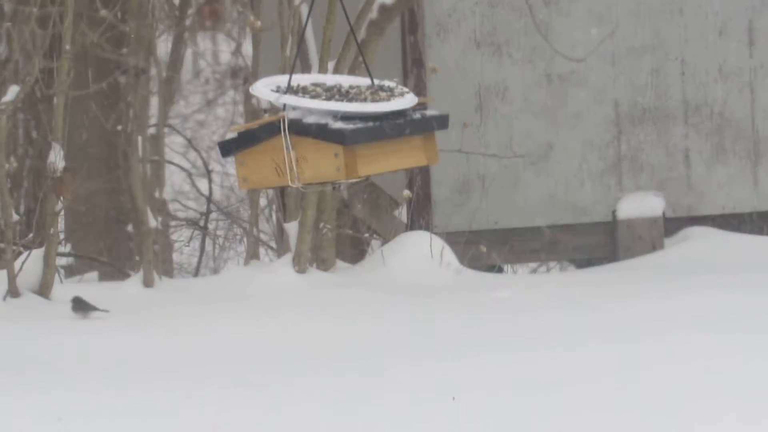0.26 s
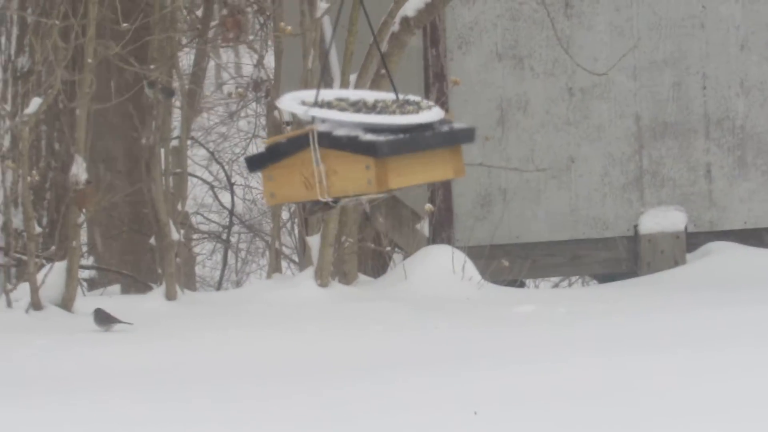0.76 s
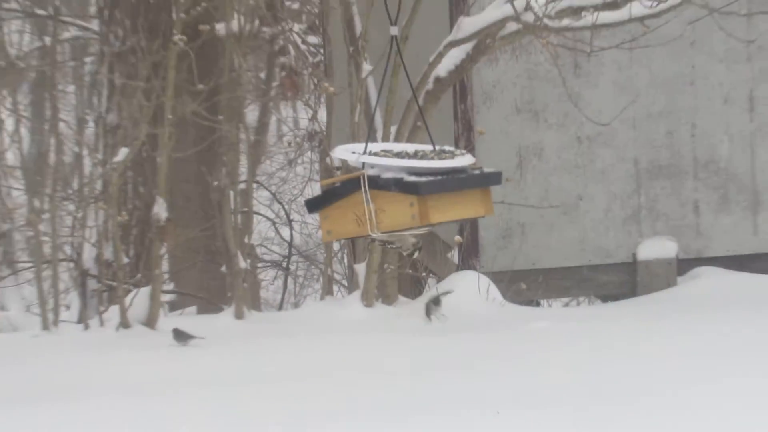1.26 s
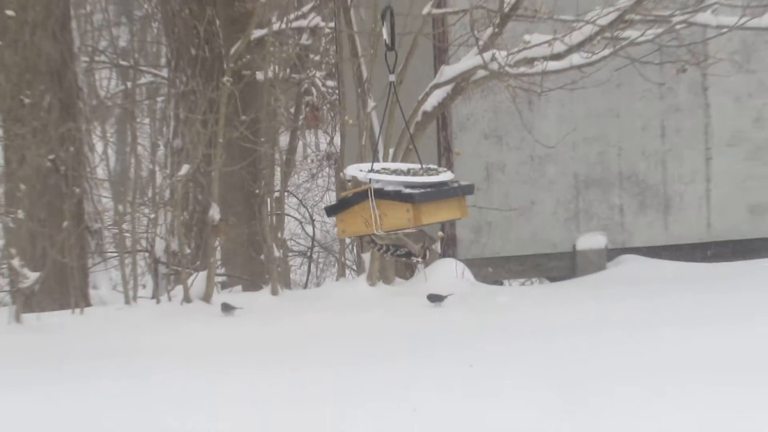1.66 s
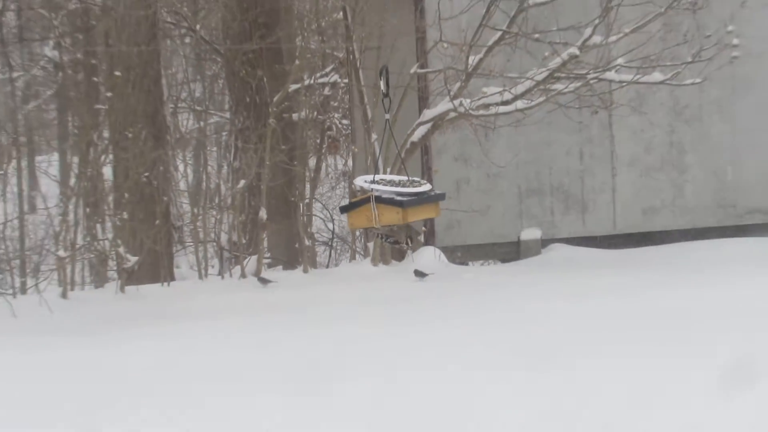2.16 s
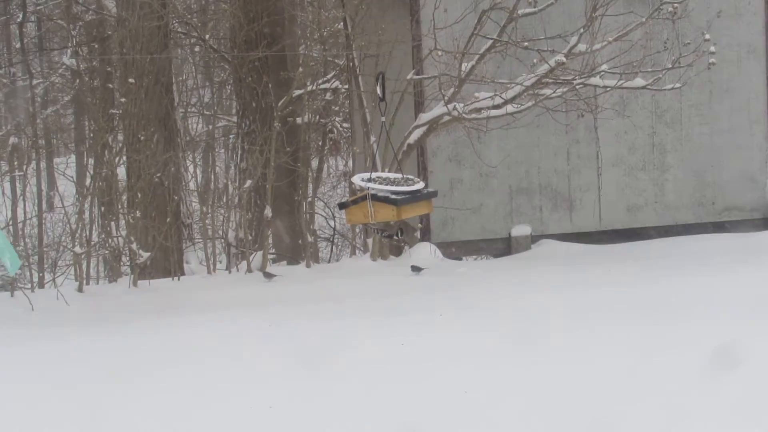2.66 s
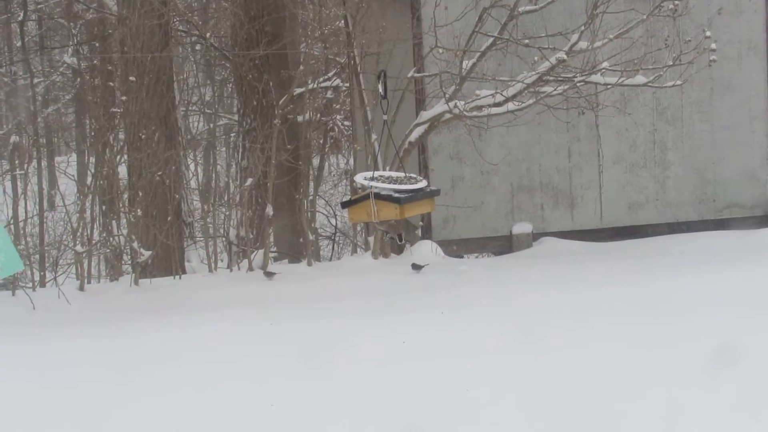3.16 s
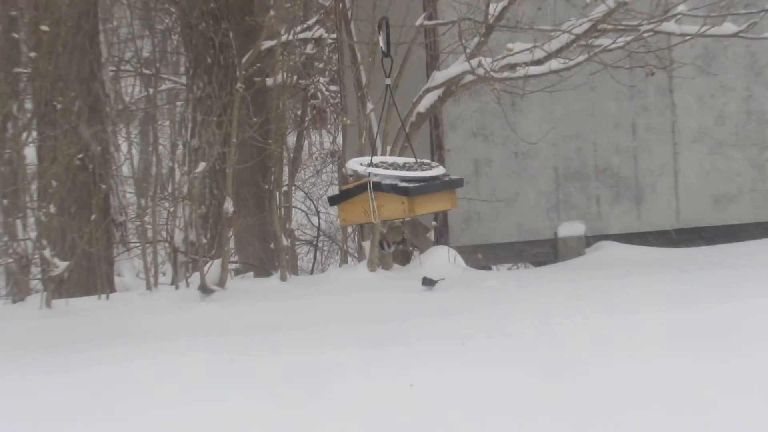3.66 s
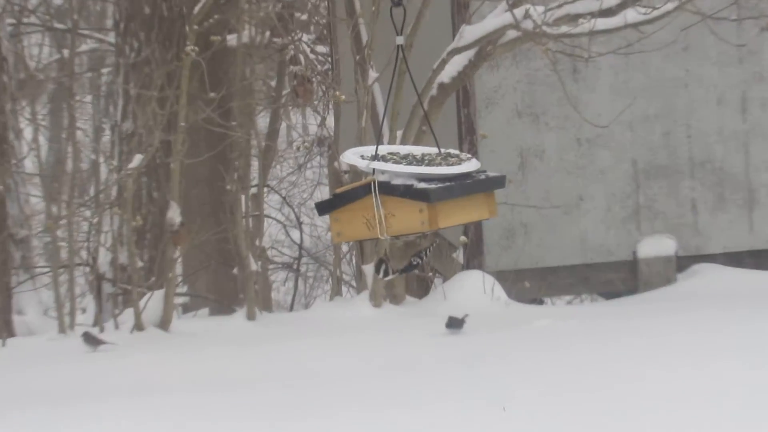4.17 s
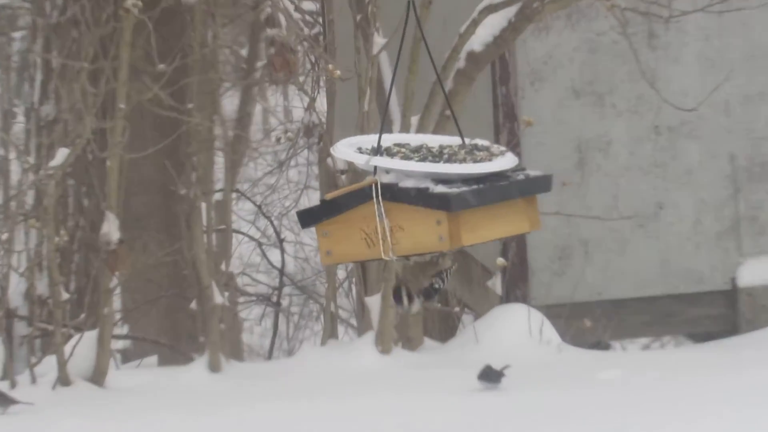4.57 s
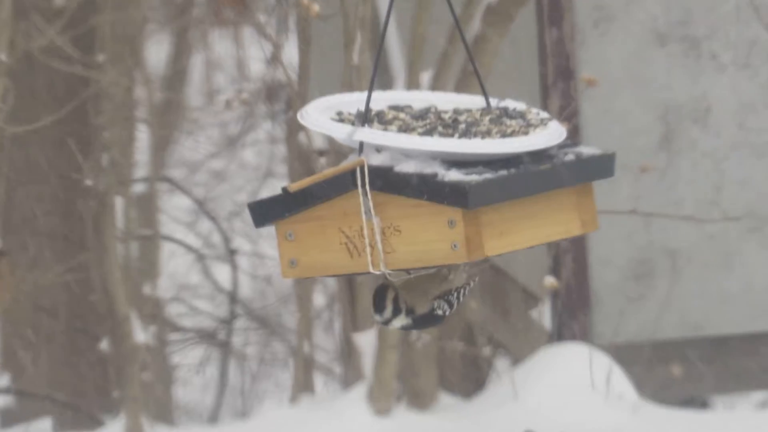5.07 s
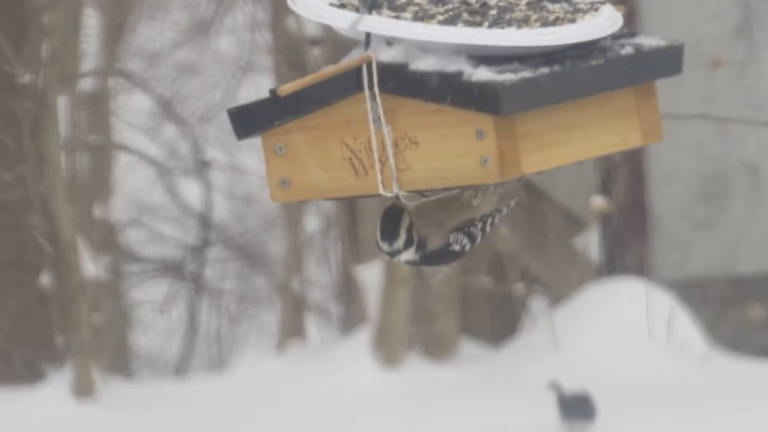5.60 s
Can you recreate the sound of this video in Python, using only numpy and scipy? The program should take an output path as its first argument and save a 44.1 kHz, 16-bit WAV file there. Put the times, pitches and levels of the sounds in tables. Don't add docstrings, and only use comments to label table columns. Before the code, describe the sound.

Close-up camera handling noise: loud snaps, creaks, a buzzing zoom motor, a quiet gap with clicks, a second buzz, and closing clicks.

```python
import sys
import numpy as np
from scipy import signal
from scipy.fft import rfft, irfft, next_fast_len
from scipy.io import wavfile
from scipy.ndimage import uniform_filter1d

SR = 44100
rng = np.random.default_rng(int(sys.argv[2]) if len(sys.argv) > 2 else 0)


def waveform_to_disk(signal):
    frames = np.transpose(np.atleast_2d(signal))
    scaled = np.clip(frames, -1, 1) * 32767
    samples = np.round(scaled).astype(np.int16)
    wavfile.write(sys.argv[1], SR, samples)


def makeup_ratio(level_db):
    decades = np.asarray(level_db, float) / 20
    return 10 ** decades


N = 257367

# time_s, level_db
GAIN = [(0.0, -54.5), (0.16, -65), (0.5, -63), (0.8, -59), (0.99, -61.5), (1.02, -80.5), (1.27, -67.5),
        (1.62, -62.5), (2.16, -59.5), (2.45, -64), (3.1, -58), (3.3, -69.5), (3.41, -60.5), (3.93, -57.5),
        (4.2, -55.5), (5.32, -55.5), (5.5, -58.5), (5.84, -61)]
# pitch_hz, level_db, t60_s (time to fade by 60 dB)
SHELL = [(2060, -8, 0.03), (2330, -1, 0.02), (2560, 9, 0.016), (2920, 0, 0.031), (3166, 17, 0.0087),
         (3440, 2, 0.021), (3660, 7, 0.022), (4520, -14, .01)]
# pitch_hz, level_db, t60_s
KNOCK = [(930, 12.6, 0.037), (1013, 5.4, 0.07), (1250, 14.4, 0.018), (1528, 10, 0.034)]


def rms_one(x):
    return x / np.sqrt(np.mean(x ** 2) + 1e-20)


def smooth(curves):
    return uniform_filter1d(curves, size=300, mode="nearest")


def in_time(spans):
    t = np.arange(N) / SR
    out = -130
    for rows in spans:
        time_s, *columns = np.transpose(rows)
        curves = [np.interp(t, time_s, c, left=-130, right=-130) for c in columns]
        out = np.maximum(out, curves)
    return smooth(out)


def coloured(x, spectrum):
    size = next_fast_len(N)
    hz, level_db = np.transpose(spectrum)
    f = np.arange(size // 2 + 1) * SR / size
    gain = makeup_ratio(np.interp(np.log(f + 1), np.log(hz), level_db, left=-90, right=-90))
    return rms_one(irfft(rfft(x, size) * gain, size)[..., :N])


def drift(rate_hz):
    r = np.exp(-2 * np.pi * rate_hz / SR)
    wander = signal.lfilter([1], [1, -2 * r, r * r], rng.standard_normal(N + SR))
    return rms_one(wander[SR:])


def resonance(x, hz, width_hz):
    r = np.exp(-np.pi * width_hz / SR)
    poles = [1, -2 * r * np.cos(2 * np.pi * hz / SR), r * r]
    return signal.lfilter([(1 - r * r) / 2, 0, (r * r - 1) / 2], poles, x)


def low_pass(x, hz):
    return signal.sosfilt(signal.butter(6, hz, fs=SR, output="sos"), x)


def strike(times, peaks_db, modes, contact_s, centres_hz=None, spread=.3):
    overtone, overtone_share = 1.45, 0.6
    out = np.zeros(N + 6000)
    t = np.arange(6000) / SR
    contact_t = t[:900]
    hz, level_db, t60 = np.transpose(modes)[:, :, None]
    rings = np.sin(2 * np.pi * hz * t) * makeup_ratio(level_db - 60 * t / t60)
    pressure = contact_t / contact_s * np.exp(-contact_t / contact_s)
    rattles = rng.standard_normal((len(times), 900)) * pressure
    strengths_db = rng.normal(0, 2.5, (len(times), len(modes)))
    for k, s in enumerate(times):
        reach = np.abs(np.exp(-2j * np.pi * hz * contact_t) @ rattles[k])
        near = 1
        if centres_hz is not None:
            distance = np.log(hz / centres_hz[k] / [1, overtone]) / spread
            near = 0.041 + np.exp(-.5 * distance ** 2) @ [1, overtone_share]
        ringing = (near / reach * makeup_ratio(strengths_db[k])) @ rings
        blow = signal.fftconvolve(ringing, rattles[k])[:6000]
        at = round(s * SR)
        out[at:at + 6000] += makeup_ratio(peaks_db[k]) * blow / np.abs(blow).max()
    return out[:N]


def train(rows, gap_s, uneven_s, uneven_db):
    trains = []
    for first_s, last_s, first_db, last_db in rows:
        count = round((last_s - first_s) / gap_s) + 1
        trains.append(np.linspace([first_s, first_db], [last_s, last_db], count).T)
    s, peak_db = np.hstack(trains)
    play = rng.standard_normal((len(s), 2))
    return s + uneven_s * play[:, 0], peak_db + uneven_db * play[:, 1]


def outdoor_air():
    # pitch_hz, level_db
    air_colour = [(25, -22), (60, -5.5), (150, 3), (220, -2.5), (310, 1.5), (420, -6), (520, -5),
                  (620, -15.5), (900, -9.5), (1500, -24), (1900, -41), (4500, -37), (6000, -83)]
    hiss_colour = [(1500, -4), (5000, -6), (9000, -0.5), (13000, -3.0), (14300, -5), (15300, -15.5)]
    air_db = in_time([GAIN])[0]
    inside = makeup_ratio(air_db + 20.5) * coloured(rng.standard_normal(N), air_colour) * makeup_ratio(3.6 * drift(14.0))
    own_air = makeup_ratio(air_db + 7.0) * coloured(rng.standard_normal((2, N)), air_colour)
    capsule_hiss = makeup_ratio(air_db - 8.0) * coloured(rng.standard_normal((2, N)), hiss_colour)
    return inside, own_air + capsule_hiss


def focus():
    # first_s, last_s, first_db, last_db
    tick_trains = [(2.6306, 2.9644, -51, -47), (2.653, 2.72, -45.5, -41.5), (2.7867, 2.7867, -46.5, -48),
                   (2.8545, 2.9207, -38.5, -43), (5.692, 5.76, -48, -50), (5.733, 5.7997, -49, -47.5)]
    # start_s, stop_s, start_db, stop_db
    whine_spans = [
        (0.0, .3, -54, -76),
        (0.31, 0.797, -72.5, -62),
        (2.44, 3.222, -69, -55),
        (5.62, 5.839, -86, -60),
    ]
    s, peak_db = train(tick_trains, gap_s=0.067, uneven_s=0.0011, uneven_db=0.3)
    ticks = low_pass(strike(s, peak_db + 8.0, KNOCK[2:] + SHELL[1:5], 0.00144), 3050)
    whine = rms_one(resonance(resonance(rng.standard_normal(N), 504, 50), 510, 70))
    whine_db = in_time([[(a, a_db), (b, b_db)] for a, b, a_db, b_db in whine_spans])[0]
    return ticks + makeup_ratio(whine_db + 21.0) * whine


def bumps():
    # start_s, peak_db, pitch_hz, t60_s
    palm_bumps = [
        (0.899, -21, 384, 0.03),
        (2.559, -21, 319, 0.16),
        (3.312, -16, 190, 0.049),
        (5.409, -13, 278, 0.025),
        (5.61, -22, 297, 0.22),
    ]
    booms = [strike([s], [peak_db], [(hz, 0, t60)], 0.001) for s, peak_db, hz, t60 in palm_bumps]
    return low_pass(sum(booms), 670)


def rubbing():
    # start_s, length_s, start_db, end_db
    finger_strokes = [(0, 0.15, -41, -43), (0.117, 0.077, -38, -42), (0.229, .075, -41, -52),
                      (0.319, 0.057, -36.5, -53), (0.396, .05, -36, -51), (.45, .07, -53.5, -59),
                      (.52, 0.076, -52.5, -42), (0.613, 0.035, -52, -43.5), (0.675, 0.053, -67, -45.5),
                      (0.768, .035, -32, -47.5), (0.808, 0.033, -37, -39), (0.882, .04, -37.5, -38),
                      (0.957, 0.054, -36.5, -37.5), (1.037, 0.032, -44, -40.5), (1.145, 0.05, -59, -67),
                      (2.42, .02, -50.5, -62), (2.455, .008, -57, -66), (2.566, 0.026, -52, -64),
                      (2.931, 0.042, -74, -58), (2.994, 0.015, -40, -56), (3.018, 0.081, -50.5, -58),
                      (3.129, .025, -38.5, -52), (3.156, 0.04, -49.5, -55), (3.251, 0.018, -41, -39),
                      (3.309, 0.0087, -23.5, -38), (5.472, 0.026, -43, -62), (5.545, 0.0044, -66, -62),
                      (5.605, 0.011, -50.5, -48.5), (5.61, 0.045, -55, -77), (5.797, 0.032, -69, -59)]
    # pitch_hz, level_db
    rubbed = [(600, -1.5), (950, -19.5), (1200, -6), (1900, -2.5), (2300, 5.5), (3200, 5.5), (3900, -4),
              (4800, -18), (7000, -23), (10000, -32)]
    rise_db_per_s, fall_db_per_s = 903, 596
    t = np.arange(N) / SR
    levels = []
    for s, length, first_db, last_db in finger_strokes:
        slide = np.interp(t, [s, s + length], [first_db, last_db])
        before, after = (s - t).clip(0), (t - s - length).clip(0)
        levels.append(slide - rise_db_per_s * before - fall_db_per_s * after)
    grains = rng.standard_normal(N) * makeup_ratio(2.2 * drift(150) + 1.5 * drift(25))
    return makeup_ratio(np.max(levels, axis=0) + 2.5) * coloured(grains, rubbed)


def blows(table, contact_s):
    # pitch_hz, level_db, t60_s
    thud_modes = [(199, -22, 0.076), (344, -4.5, 0.075), (419.5, 0.5, 0.055), (560, 2, 0.016)]
    # pitch_hz, level_db, t60_s
    crack_modes = [(5000, -3.5, 0.00093), (7140, 6.5, 0.0018), (9440, 2, 0.0025), (11000, -27, 0.00072),
                   (11700, -21.5, 0.00094)]
    s, peak_db, centre_hz, knock_db, crack_db = np.transpose(table)
    body_db = peak_db + knock_db
    ring = strike(s, peak_db + 4.0, SHELL, contact_s, centre_hz, spread=0.11)
    knock = strike(s, body_db + 10.5, KNOCK, 1.43 * contact_s)
    thud = strike(s, body_db - 6.5 + 15.5, thud_modes, contact_s)
    cracks = [strike(s, peak_db + crack_db + side_db, crack_modes, 1.57 * contact_s)
              for side_db in (3.5, -3.5)]
    return low_pass(ring, 3880) + low_pass(knock, 1570) + low_pass(thud, 1100), np.array(cracks)


def handling():
    # start_s, peak_db, ring_centre_hz, body_db, crack_db (last two relative to the peak)
    lever_snaps = [(0.1369, 3, 2390, -22, -34), (0.2372, -2, 2310, -22.5, -45),
                   (0.3149, -10, 2310, -15.5, -60), (0.3603, -41, 2840, 1.5, -33),
                   (0.395, -12.5, 2330, -15.5, -52), (0.8106, -11.5, 2540, -13, -28),
                   (0.823, -12, 2290, -15.5, -41), (0.9622, -6.5, 3000, -21.5, -31.5),
                   (1.049, -19, 3240, -44, -27), (1.0791, -17, 3380, -64, -43),
                   (2.9922, -13, 2763, -18.5, -11.5), (3.0527, -32.5, 3050, -1, -26),
                   (3.1317, -22, 4140, -17, -21), (3.2986, -3.5, 2920, -25.5, -16),
                   (3.3078, -3.5, 3200, -23.5, -32), (5.4063, -10.5, 2920, -34, -12),
                   (5.4096, -10, 3200, -12.5, -13.5)]
    # start_s, peak_db, ring_centre_hz, body_db, crack_db
    grip_slips = [(0.5187, -40, 2260, -8, -29), (0.6107, -21.5, 2260, -3.5, -28),
                  (0.6418, -31, 2640, 1, -26), (0.7188, -39, 2200, -23, -29), (0.855, -14, 3020, -20, -29),
                  (0.9494, -16.5, 1980, -21, -37), (0.9529, -18, 3270, -15, -19),
                  (1.0335, -21.5, 3240, -23, -29), (1.0624, -31, 2700, -29, -32),
                  (1.0684, -19, 3120, -39, -20.5), (1.1546, -31, 2970, -10.5, -16),
                  (1.1647, -35, 2820, -23, -28), (1.1838, -33.5, 2950, -11, -23),
                  (1.1982, -35.5, 2980, -9, -18), (2.4568, -42, 2670, -5, -38.5),
                  (2.5552, -34, 2630, 0.5, -27), (3.0257, -37.5, 2590, -16, -16),
                  (3.1163, -37, 3770, -9, -8), (3.2252, -37, 2800, -23, -16), (3.248, -23, 3320, -40, -22),
                  (3.2562, -23, 3400, -54, -21), (5.5348, -38, 2630, 0, -28), (5.6097, -34, 3300, 2, -16),
                  (5.5945, -40.5, 2500, 2.5, -28)]
    # first_s, last_s, first_db, last_db
    creak_trains = [
        (0.8721, 0.9028, -14.5, -17),
        (0.9155, 0.923, -16, -22),
        (0.9653, 0.9873, -22, -25.5),
        (0.999, 1.0098, -14.5, -19.5),
    ]
    snaps, snap_cracks = blows(lever_snaps, contact_s=0.00043)
    times, peaks_db = train(creak_trains, gap_s=0.007, uneven_s=.0004, uneven_db=1.0)
    creaks = [(s, db, 3120, -15.5, -37) for s, db in zip(times, peaks_db)]
    slips, slip_cracks = blows(grip_slips + creaks, contact_s=.0011)
    return snaps + slips + rubbing(), snap_cracks + low_pass(slip_cracks, 9600)


def run_levels():
    # start_s, stop_s, knock_db (above the gain), moan_start_hz, moan_stop_hz
    runs = [
        (1.095, 2.426, 16.5, 262, 305),
        (3.312, 5.482, 16, 278.5, 286.3),
    ]
    # hiss_db, rumble_db, moan_db, hum_db, moan_swell_s
    run_layers = [
        (0.8, 8, 7.5, -7, 0.38),
        (3, 7, 6.5, 2.5, 0.022),
    ]
    t, gain_db = np.arange(N) / SR, in_time([GAIN])[0]
    out = np.full((6, N), -130.)
    for run, layers in zip(runs, run_layers):
        start, stop, knock_db, first_hz, last_hz = run
        hiss_db, rumble_db, moan_db, hum_db, swell_s = layers
        on = (t >= start) & (t < stop)
        age, gain = t[on] - start, gain_db[on]
        kick = 16.5 * np.exp(-age / 0.053)
        swell = -8 * np.exp(-age / swell_s)
        load = -15 * np.exp(-age / 0.83)
        strain = 5.5 * np.exp((t[on] - stop) / 0.05)
        out[:, on] = [gain + knock_db + kick,
                      gain + hiss_db + 0.2 * kick,
                      gain + rumble_db + 0.75 * kick + strain,
                      gain + moan_db + swell,
                      gain + hum_db + load,
                      first_hz + (last_hz - first_hz) * age / (stop - start)]
    return smooth(out)


def rails(turns, moan_db, hum_db, moan_hz):
    wander_hz = 15 * drift(8.02)
    phase = 2 * np.pi * np.cumsum(moan_hz.clip(240) + wander_hz) / SR
    moan = makeup_ratio(moan_db + 15.5 + 2.2 * drift(20)) * np.sin(phase)
    hum = makeup_ratio(hum_db + 20 + 1.1 * drift(1.5)) * np.sin(2 * np.pi * turns)
    return moan + hum


def lens_barrel(turns):
    # pitch_hz, width_hz, level_db, share that pulses with the steps (0-1)
    barrel_modes = [(895, 610, -13.5, 0.63), (1005, 264, -4, 0), (1503, 101, -8.5, 0.24),
                    (1854, 280, -12.5, 0.01), (2310, 30, -8, 0.4), (2630, 130, 1, 0.74),
                    (2763, 122, 1.5, 0.99), (2970, 102, 0, 1), (3135, 62, -3, 0), (3537, 139, -0.5, 0.9),
                    (3850, 236, -9, 0), (4370, 314, -10.5, 0.6)]
    steps = np.flatnonzero(np.diff(turns.astype(int)))
    play = rng.standard_normal((len(steps), 3))
    at = (steps + .00025 * SR * play[:, 0]).astype(int).clip(0, N - 1)
    burst = np.zeros(N)
    burst[at] = makeup_ratio(0.2 * play[:, 1]) * np.sign(play[:, 2] + .6)
    burst = rms_one(burst)
    grit = rng.standard_normal(N) * makeup_ratio(0.9 * drift(38))
    barrel = 0
    for k, (hz, width_hz, level_db, share) in enumerate(barrel_modes):
        push = np.sqrt(share) * burst + np.sqrt(1 - share) * grit
        ring = resonance(resonance(push, hz, width_hz), hz, 4.9 * width_hz)
        barrel = barrel + (-1) ** k * makeup_ratio(level_db) * ring
    return rms_one(signal.sosfilt(signal.butter(4, 4500, fs=SR, output="sos"), barrel))


def motor():
    # time_s, steps_per_s
    step_rate = [(1.095, 105), (1.16, 120), (1.24, 150), (1.3, 199.6), (3.3, 199.6), (3.32, 115),
                 (3.385, 125), (3.41, 199.6), (5.6, 199.6)]
    # pitch_hz, level_db
    gear_hiss = [(4600, -29), (5500, -7.5), (6100, -13.5), (7000, -4.5), (7500, -8.5), (8000, 0.5),
                 (9700, -1.5), (10500, -14), (12000, -10), (13100, -17.5), (13700, -26)]
    # pitch_hz, level_db
    drive_rumble = [(25, -18.5), (60, 3.5), (90, 4.5), (130, -5.5), (290, -1.5), (400, -15.5), (550, -11),
                    (700, -24), (900, -7)]
    # first_s, last_s, first_db, last_db
    tooth_catches = [
        (2.169, 2.282, -34, -28),
        (2.301, 2.36, -26.5, -29),
    ]
    knock_db, hiss_db, rumble_db, *moaning = run_levels()
    turns = np.cumsum(in_time([step_rate])[0].clip(100)) / SR
    beat = makeup_ratio(2.3 * np.sin(2 * np.pi * turns / 3 + 8.9 * drift(2.6)) + 2.1 * drift(46))
    sides = makeup_ratio([[5.5], [-6]])
    hiss = coloured(rng.standard_normal((2, N)), gear_hiss) * rms_one(beat) * sides
    rumble = coloured(rng.standard_normal(N), drive_rumble) * makeup_ratio(4.1 * drift(2.5))
    s, peak_db = train(tooth_catches, gap_s=0.019, uneven_s=0.0025, uneven_db=1.5)
    catch = low_pass(strike(s, peak_db + 7.0, KNOCK + SHELL[1:7], 0.00095), 4300)
    drive = makeup_ratio(knock_db + 5.0) * lens_barrel(turns) + makeup_ratio(rumble_db + 13) * rumble
    return drive + rails(turns, *moaning) + catch, makeup_ratio(hiss_db) * hiss


def ports(x):
    port_hz, port_q, port_db, lag_s = 2046, 1.035, -4.5, -0.0000009
    r = np.exp(-np.pi * np.array([60, 420]) / SR)
    turn = np.cos(2 * np.pi * 695 / SR)
    left = signal.lfilter([1, -2 * r[0] * turn, r[0] ** 2], [1, -2 * r[1] * turn, r[1] ** 2], x)
    size = next_fast_len(N + 999)
    f = np.arange(size // 2 + 1) * SR / size
    duct = np.exp(-2j * np.pi * f * lag_s) / (1 - (f / port_hz) ** 2 + 1j * f / port_hz / port_q)
    right = -makeup_ratio(port_db) * irfft(rfft(left, size) * duct, size)[:N]
    return np.array([left, right])


def scene():
    air, capsule_air = outdoor_air()
    clicks, cracks = handling()
    drive, hiss = motor()
    return ports(air + focus() + bumps() + clicks + drive) + capsule_air + cracks + hiss


def band_limit(x):
    return signal.sosfilt(signal.butter(12, 16320, fs=SR, output="sos"), x)


def record(dry):
    top_cut = signal.butter(8, 15500, fs=SR, output="sos")
    mix = np.clip(signal.sosfilt(top_cut, dry), -1, 1)
    return band_limit(mix)


dry = scene()
out = record(dry)
waveform_to_disk(out)
```